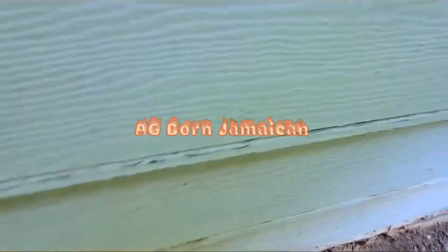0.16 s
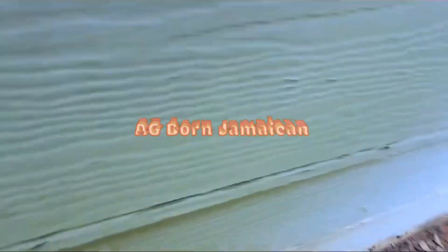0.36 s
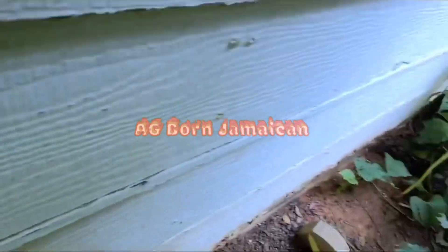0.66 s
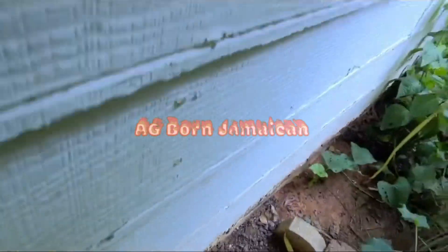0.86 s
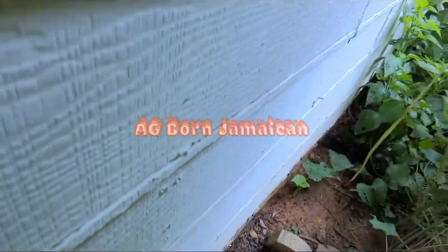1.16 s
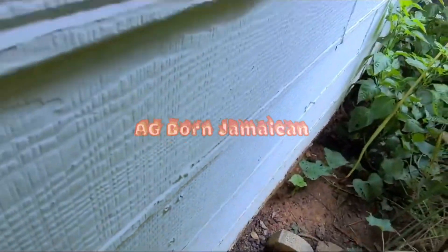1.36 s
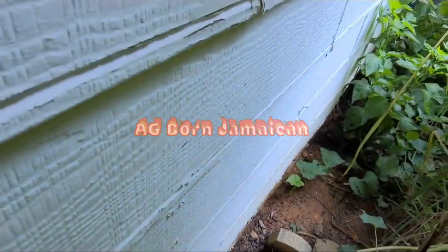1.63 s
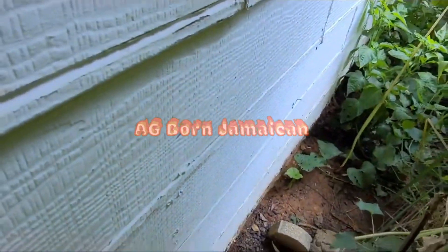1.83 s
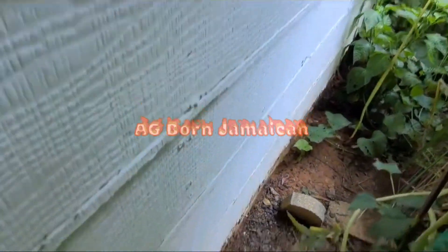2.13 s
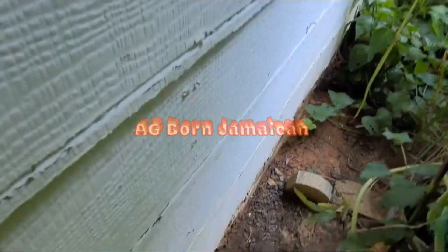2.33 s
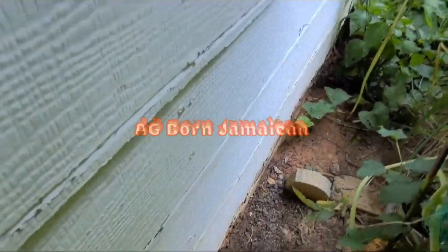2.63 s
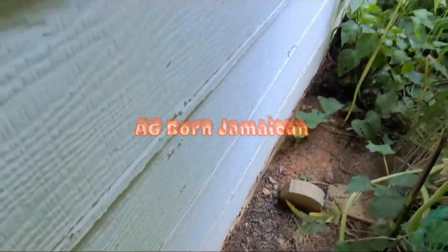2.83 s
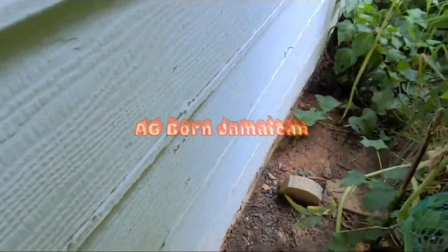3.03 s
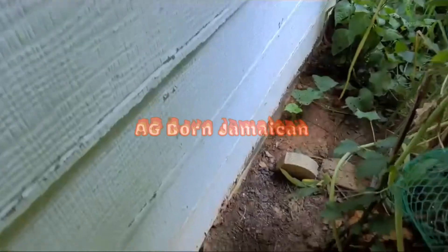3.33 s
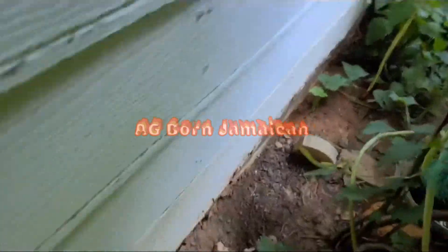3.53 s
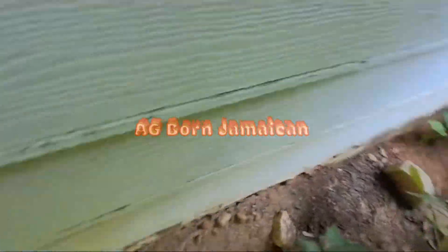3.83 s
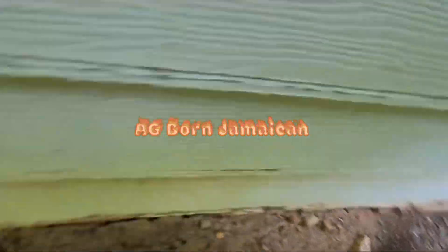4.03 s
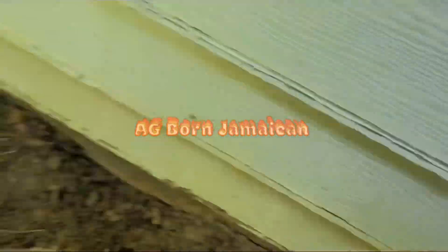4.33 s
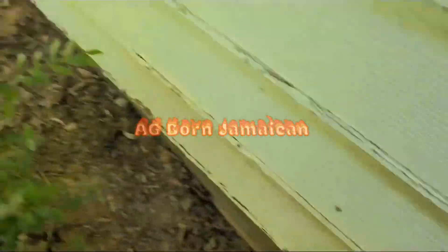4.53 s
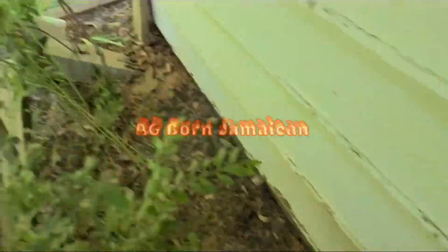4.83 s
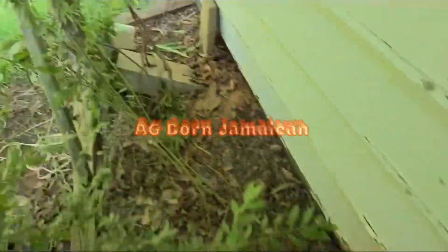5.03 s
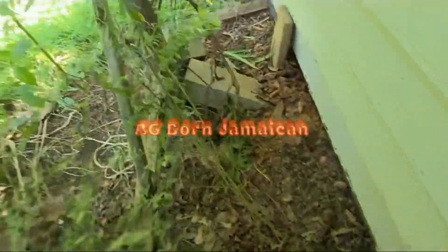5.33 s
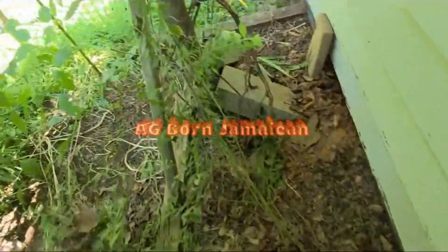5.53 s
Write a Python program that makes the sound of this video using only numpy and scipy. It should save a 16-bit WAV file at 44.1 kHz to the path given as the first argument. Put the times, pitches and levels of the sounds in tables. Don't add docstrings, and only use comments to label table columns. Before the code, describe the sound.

A narrow yard beside a wall, heard through a small hand-held stereo microphone. From 0 s a slow heavy engine drones in the distance, a low buzzing stack of tones near 100 Hz, over soft street rumble and thin hiss. Leaves rustle close by at first, with a brush and brief hollow whoosh near 0.8 s and a snap at 0.55 s. From about 1.2 to 3 s the foliage is almost still, with only faint ticks. The engine dips near 2 s, then grows as tyre roar swells with a hollow tone by the wall. A bright tick snaps at 3.3 s and rustling returns. Around 3.6 to 4.6 s the vehicle passes, fuller and raspier, its pitch sinking smoothly. A sharp leaf snap lands near 4.5 s. Afterward the lower drone is softer and plainer, briefly dipping near 4.9 s, with tyre roar lingering and duller rustling thinning toward 5.7 s.

```python
import sys
import numpy as np
from scipy import signal
from scipy.io import wavfile

SR = 44100
rng = np.random.default_rng(int(sys.argv[2]) if len(sys.argv) > 2 else 0)


def inscribe(sig):
    pcm = np.round(np.clip(np.atleast_2d(sig).T, -1, 1) * 32767)
    wavfile.write(sys.argv[1], SR, pcm.astype(np.int16))


def field_ratio(decibels):
    return 10 ** (np.asarray(decibels, dtype=float) / 20)


N = 250478


def engine(odd_turn, scatter, wobble_db, waver):
    # (multiple of the cycle [count],
    # far ahead [dB], nearing [dB], abreast of the exhaust [dB], from behind [dB])
    order_mix = [(2, -43, -44, -44, -47), (3, -49, -46, -45, -44), (4, -28, -23, -26, -37),
                 (5, -30, -21, -16, -23), (6, -26, -22, -22, -46), (7, -39, -28, -24, -28),
                 (8, -42, -52, -39, -38), (9, -46, -41, -31, -42), (10, -55, -57, -32, -37),
                 (11, -53, -44, -30, -55), (12, -55, -64, -33, -39), (13, -44, -53, -43, -56),
                 (14, -60, -65, -39, -50), (15, -48, -52, -60, -48), (16, -63, -65, -56, -54),
                 (17, -52, -58, -53, -52), (18, -65, -52, -51, -61)]
    # (time [s], level [dB])
    effort_curve = [(0, -3.5), (.9, -1), (1.4, -0.5), (2.0, -5), (2.5, -1.2), (3.0, -2.5), (3.3, 1.5),
                    (3.85, 2), (4.45, 0.7), (4.85, -3.5), (5.15, -0.6), (5.68, -1)]
    lead_rad = (.015, 0.056, 0.2, 0.071)
    cycle_hz, speed_m_per_s, nearest_m, nearest_s = 20.014, 23.0, 30.6, 3.851
    sound_m_per_s = 343
    bark_lead_s = .11
    shadow_db, shadow_s, shadow_half_s = -7, 1.85, .18

    t = np.arange(N) / SR
    along_m = speed_m_per_s * (t - nearest_s)
    away = along_m / np.hypot(along_m, nearest_m)
    cycles_per_s = cycle_hz * (1 - speed_m_per_s / sound_m_per_s * away)
    turn = 2 * np.pi * np.cumsum(cycles_per_s) / SR
    boom, bark = stretches(), stretches(bark_lead_s)
    lead = blend(lead_rad)
    effort = field_ratio(in_time(effort_curve)[0])
    shadow = field_ratio(shadow_db * np.exp(-((t - shadow_s) / shadow_half_s) ** 2))

    out = np.zeros((2, N))
    for order, *side_db in order_mix:
        high = order > 7
        facing = bark if high else boom
        intake = field_ratio(side_db[0]) * facing[0] * high
        height = (field_ratio(np.array(side_db)) @ facing - intake) * effort + intake
        height -= intake * (1 - shadow)
        frontal = high * np.minimum(facing[0] + facing[1], 1) * (1 - facing[2])
        shift = lead * np.sqrt(order / 5) * (1 - frontal) - 0.036 * order * frontal
        ring = np.arctan2(3 * order, 5.5 ** 2 - order ** 2)
        echo = scatter * max(order - 8, 0) ** 2
        phase = order * turn - ring - echo + odd_turn * (order % 2) + waver * drift(2.5)
        height = np.sqrt(2) * height * field_ratio(wobble_db * np.sqrt(order / 5) * drift(4.0))
        out += height * np.sin(phase + shift * np.array([[1], [-1]]))
    return out


def tyres():
    # (frequency [Hz], level [dB per Hz])
    roar_colour = [(330, 2.5), (430, 1), (560, 1), (800, 3), (1000, -5.5), (1400, 2.5), (1900, -5),
                   (2200, -7.5), (2800, -12.5), (4200, -26.5)]
    # (frequency [Hz], far ahead [dB], nearing [dB], abreast [dB], behind [dB])
    zones = np.array([(337, 1.5, 10, 5, 1.5), (457, -0.5, 1.5, 2, 4), (818, 8, 4.5, 6.5, 0.5),
                      (1470, 1.5, 2, 1, 1.5)])
    # (time [s], level [dB])
    road_curve = [(0, -49.5), (1.3, -48.5), (2.3, -46), (3.1, -43.5), (3.6, -44), (4.1, -45.5),
                  (4.8, -43.5), (5.68, -43.5)]
    # (far ahead [dB], nearing [dB], abreast [dB], behind [dB])
    wall_mix = np.array([(-1, 3, -8, -14), (6, 1.5, -6, 4.5), (-2.5, -7.5, -7, -5), (-3.5, -3, -4.5, -4.5)])
    wall_faced_db, wall_turn_s = (-8, -11, -6, 0), 0.79

    straight = in_time(road_curve)[0] + blend(zones[:, 1:])
    wall = blend(wall_mix) + np.outer(wall_faced_db, 1 - soft_switch(wall_turn_s, .2))

    def tint(hz):
        log_zones = np.log(zones[:, 0])
        share = np.array([np.interp(np.log(hz), log_zones, row) for row in np.eye(len(zones))])
        return share @ straight, share @ wall

    return field_ratio(4.0) * banded_noise(roar_colour, patchy_db=1.0, patch_rate=3.4, count=12, tint=tint)


def gap_tone():
    # (time [s], peak level [dB], half length [s], frequency [Hz])
    gap_swells = [
        (1.55, -46, 1, 422.5),
        (2.4, -50.5, 0.44, 429.8),
        (3.4, -47.5, .4, 428),
        (5.1, -50, 0.88, 430),
    ]
    return hollow(gap_swells, width_hz=44, wide_db=-0.5)


def wall_hollow():
    # (time [s], peak level [dB], half length [s], frequency [Hz])
    wall_swells = [
        (.3, -47, 0.29, 851),
        (.775, -38.5, 0.056, 773),
        (3.4, -39.5, 0.19, 640),
        (3.73, -41, 0.16, 825.6),
        (5.5, -42.5, 0.68, 719),
    ]
    return hollow(wall_swells, width_hz=220, wide_db=-6.5)


def leaves(per_s, size_db, left_db):
    # (frequency [Hz], level [dB per Hz])
    leaf_colour = [(600, 5), (1500, -1.5), (4200, -0.5), (9000, -8), (14500, -6.5), (16000, -8)]
    # (time [s], level [dB])
    rustle_curve = [(0, -43.5), (.5, -51), (1.05, -50.5), (1.25, -61), (1.6, -62.5), (2.5, -63), (2.8, -61),
                    (3.15, -54), (3.45, -48.5), (3.7, -44), (4.6, -43.5), (5.68, -49.5)]
    # (time [s], peak level [dB], half length [s])
    swishes = [(0.074, -43, 0.015), (0.29, -52.5, 0.036), (0.656, -52, 0.01), (0.778, -41, 0.029),
               (0.94, -56, 0.026), (1.642, -68, .01), (2.53, -61, 0.016), (3.128, -61.5, 0.03),
               (3.263, -47, 0.01), (3.307, -48.5, 0.026), (4.476, -41, 0.0066), (5.425, -53.5, .015)]
    near_tilt_db, far_tilt_db, far_from_s = 2.5, -10, 3.65

    level = field_ratio(in_time(rustle_curve)[0]) + swells(swishes)
    tilt_db = near_tilt_db + (far_tilt_db - near_tilt_db) * soft_switch(far_from_s, .1)
    crackle_size = field_ratio(size_db * np.minimum(rng.exponential(1, N), 3))
    crackle = crackle_size * (rng.random(N) < per_s / SR)
    grain = signal.lfilter([1], [1, -.97], crackle)
    noise = banded_noise(leaf_colour, patchy_db=.6, patch_rate=14.0, count=7,
                         tint=lambda hz: (tilt_db * max(np.log2(hz / 8000), 0), 0))
    return level * field_ratio([[3.5 + left_db], [1.5]]) * noise * rms_one(1 + 0.35 * grain)


def ticks(decay_s):
    # (time [s], peak level [dB], centre [Hz], spread [ratio], left over right [dB])
    tick_list = [(0.298, -34, 11000, 1.35, -11), (0.5607, -28, 6130, 1.34, -2.5),
                 (.6165, -40.5, 9000, 1.8, 4), (1.6255, -49, 10800, 1.3, 6), (1.934, -41, 13100, 1.2, -7),
                 (2.14, -45.5, 14200, 1.12, -1), (2.316, -54, 14400, 1, -7), (3.3056, -24, 14300, 1.1, 4.5),
                 (3.443, -39, 6800, 1.4, 9), (4.4225, -36.5, 6500, 1.07, 5), (4.4720, -21.5, 8500, 2.4, -1)]
    out = np.zeros((2, N))
    t = np.arange(SR // 20) / SR
    fade = np.exp(-t / decay_s) + 0.084 * np.exp(-t / 0.0034)
    bursts = rng.standard_normal((len(tick_list), 2, len(t))) * fade
    for (s, db, hz, spread, pan_db), burst in zip(tick_list, bursts):
        band = [hz / max(spread, 1.05), min(hz * spread, .45 * SR)]
        burst = signal.sosfilt(signal.butter(2, band, "band", fs=SR, output="sos"), burst)
        snap = field_ratio(db + 8.5) * burst / np.abs(burst).max()
        at = round(s * SR)
        out[:, at:at + len(t)] += snap * field_ratio(pan_db * np.array([[.5], [-.5]]))
    return out


def air():
    # (frequency [Hz], level [dB per Hz])
    rumble_colour = [(28, -30), (40, -13), (54, -15), (72, 0), (92, -4), (112, -16), (140, -21), (190, -27),
                     (310, -33)]
    # (far ahead [dB], nearing [dB], abreast [dB], behind [dB])
    rumble_db = (-29.5, -24.5, -26, -25.5)
    # (frequency [Hz], level [dB per Hz])
    hiss_colour = [(3000, -1.5), (4000, -7), (5000, -3), (6000, 1), (7200, 1.5), (8200, -24), (9500, -32)]
    # (time [s], level [dB])
    hiss_curve = [(0.0, -49.5), (0.47, -52), (1.41, -55), (2.4, -52.5), (3.0, -51.5), (3.65, -47),
                  (4.9, -49.5), (5.68, -49.5)]
    rumble = banded_noise(rumble_colour, patchy_db=2.3, patch_rate=2.8, count=10)
    hiss = banded_noise(hiss_colour, patchy_db=3.33, patch_rate=0.56, count=8)
    return field_ratio(blend(rumble_db)) * rumble + field_ratio(in_time(hiss_curve)[0]) * hiss


def hollow(rows, width_hz, wide_db):
    hz = in_time(rows)[-1]
    low_pass = signal.butter(2, width_hz / 2, fs=SR, output="sos")
    slow = signal.sosfilt(low_pass, rng.standard_normal((2, 2, N)))
    turn = 2 * np.pi * np.cumsum(hz) / SR
    mid, side = rms_one(slow[0] * np.cos(turn) + slow[1] * np.sin(turn))
    return swells(rows) * (mid + field_ratio(wide_db) * side * [[1], [-1]])


def banded_noise(spectrum, patchy_db, patch_rate, count, tint=lambda hz: (0, 0)):
    # (frequency [Hz], likeness [-1 to 1])
    likeness = [(60, 0.92), (130, 1), (290, -0.33), (640, -0.91), (1410, -0.78), (3100, -0.071),
                (15000, 0.033)]
    edges = np.geomspace(spectrum[0][0], spectrum[-1][0], count + 1)
    white = rng.standard_normal((2, 2, N + SR // 4))
    out, power = 0, 0
    for k, (low, high) in enumerate(zip(edges, edges[1:])):
        sos = signal.butter(2, [low, high], "band", fs=SR, output="sos")
        mid, side = signal.sosfilt(sos, white[k % 2])[:, SR // 4:]
        hz = np.sqrt(low * high)
        alike = np.clip(at_hz(likeness, hz), -.99, .99)
        mid_db, side_db = tint(hz)
        level = field_ratio(at_hz(spectrum, hz))
        power += np.mean((level * mid) ** 2)
        wide = np.sqrt((1 - alike) / (1 + alike)) * field_ratio(side_db)
        patches = field_ratio(mid_db + patchy_db * drift(patch_rate))
        out = out + level * patches * (mid + wide * side * [[1], [-1]])
    return out / np.sqrt(power)


def stretches(lead_s=0):
    # (opens [s], rise [s], closes [s], fall [s])
    openings = [
        (-1, .1, 2.78, .14),
        (1.82, .07, 3.63, .08),
        (3.67, .07, 4.63, .2),
        (4.3, .17, 9, .1),
    ]
    rows = np.array(openings)
    rows[2, 0] -= lead_s
    return np.array([soft_switch(opens, rise) * (1 - soft_switch(closes, fall))
                     for opens, rise, closes, fall in rows])


def blend(values):
    heard = stretches()
    return values @ (heard / heard.sum(axis=0))


def soft_switch(at_s, rise_s):
    return .5 + .5 * np.tanh((np.arange(N) / SR - at_s) / (2 * rise_s))


def swells(rows):
    t = np.arange(N) / SR
    return sum(field_ratio(db) * np.exp(-((t - s) / half_s) ** 2) for s, db, half_s, *_ in rows)


def drift(rate):
    r = np.exp(-80 * np.pi * rate / SR)
    coarse = rng.standard_normal(N // 40 + 2002)
    slow = signal.lfilter([1], [1, -2 * r, r * r], coarse)[2000:]
    return np.interp(np.arange(N) / 40, np.arange(len(slow)), rms_one(slow))


def in_time(rows):
    s, *columns = np.transpose(rows)
    return [np.interp(np.arange(N) / SR, s, c) for c in columns]


def at_hz(points, hz):
    curve = np.array(points)
    return np.interp(np.log(hz), np.log(curve[:, 0]), curve[:, 1])


def rms_one(x):
    return x / np.sqrt(np.mean(x ** 2) + 1e-20)


def scene():
    # (far ahead [dB], nearing [dB], abreast [dB], behind [dB])
    lean_db = (0.019, -0.27, -0.98, -1.1)
    motor = engine(odd_turn=1.35, scatter=-.05, wobble_db=1.0, waver=.2)
    road = tyres() + gap_tone() + wall_hollow()
    far = (motor + road + air()) * field_ratio(blend(lean_db) * np.array([[.5], [-.5]]))
    near = leaves(per_s=120, size_db=5.5, left_db=-2.0) + ticks(decay_s=.0008)
    return far + near


def roll_off(x):
    return signal.sosfilt(signal.butter(12, 15700, fs=SR, output="sos"), x)


def record(dry):
    return roll_off(dry)


dry = scene()
out = record(dry)
inscribe(out)
```